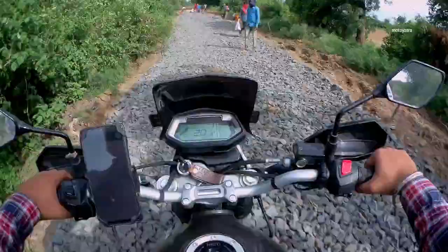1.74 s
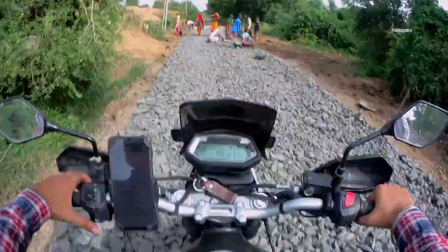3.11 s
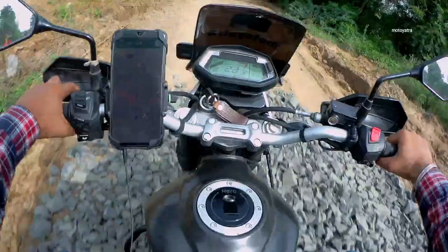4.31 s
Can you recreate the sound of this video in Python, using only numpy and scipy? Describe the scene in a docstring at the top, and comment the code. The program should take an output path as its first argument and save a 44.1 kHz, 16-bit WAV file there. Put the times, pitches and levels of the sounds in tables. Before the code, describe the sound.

A single-cylinder motorcycle creeps over coarse loose gravel, heard close and dry from the saddle. Throughout, the exhaust thuds softly, stones crunch and snap under the tyres, and a hollow plastic housing chatters, over a low rumble and a faint high hiss. In the first 1.5 seconds there are several sharp plastic knocks, with a short rasp of a sliding tyre near 0.5 seconds. Between 2 and 3 seconds the wheels drop off larger stones with dull thumps. At about 3.3 seconds the horn gives one loud, very short toot. From about 3.9 to 4.8 seconds the bike jolts over a rough patch with heavy thumps, cracking stones and a cluster of hard knocks, loudest near 4.1 seconds. Then the crunch thins on firmer ground, while the engine runs a little faster and louder and the bumping and rattling continue to the end, at about 6.7 seconds.

```python
"""On a stretch of coarse loose gravel, a single-cylinder motorcycle creeps along, heard from the saddle.
Each firing thuds softly in the exhaust, the tyres bump and crunch over the stones, and the jolts
set a hollow plastic housing chattering and knocking, all over a faint high hiss.
Halfway the horn is tapped once; then the bike jolts over a rough patch and runs on to firmer ground."""
import sys
import numpy as np
from scipy import signal
from scipy.io import wavfile
from scipy.ndimage import uniform_filter1d, minimum_filter1d

SR = 44100
rng = np.random.default_rng(int(sys.argv[2]) if len(sys.argv) > 2 else 0)


def wrap_up_sound(samples):
    """Save the sound to the file named by the first command line argument, as 16-bit audio."""
    columns = np.atleast_2d(samples).T
    # keep every value between -1 and 1, then stretch to whole-number steps
    tamed = np.clip(columns, -1, 1)
    steps = np.round(tamed * 32767).astype(np.int16)
    wavfile.write(sys.argv[1], SR, steps)


N = 293706

# The tone of the rattling housing. Each row: frequency in Hz, relative level in dB.
HOUSING_SPECTRUM = [(380, -13.5), (540, -11.5), (740, -25.5), (900, -16), (1040, -13.5), (1160, -4),
                    (1300, 0.5), (1420, -4), (1620, -9), (1720, -10), (1900, -18), (2180, -19.5),
                    (2420, -25), (15000, -64)]
# The tone of stone on stone. Each row: frequency in Hz, relative level in dB.
GRAVEL_SPECTRUM = [(900, -5.5), (2100, -1.5), (2420, -6.5), (2750, 1), (3350, -1), (3700, -3), (4050, -3),
                   (4400, -7.5), (4750, -6.5), (5600, -15), (6600, -12.5), (7220, -7.5), (7550, -13.5),
                   (15500, -36)]


def amp(db):
    """Decibels to gain."""
    return 10 ** (np.asarray(db) / 20)


def unit(x):
    """Scales to rms 1."""
    return x / np.sqrt(np.mean(x ** 2) + 1e-20)


def follow(rows):
    """Turns rows of a time and its values into one automation curve per value."""
    times, *columns = np.transpose(rows)
    return [np.interp(np.arange(N) / SR, times, column) for column in columns]


def swells(rows):
    """A bell-shaped rise and fall in dB for each row."""
    t = np.arange(N) / SR
    return sum(db * np.exp(-(2 * (t - middle) / length) ** 2) for middle, length, db in rows)


def add(mix, start_s, sound):
    """Lays a sound into the mix."""
    part = mix[max(round(start_s * SR), 0):][:len(sound)]
    part += sound[:len(part)]


def wander(rate):
    """Random drift of rms 1, up to about rate swings a second."""
    return unit(np.interp(np.arange(N) * 2 * rate / SR, np.arange(2048), rng.standard_normal(2048)))


def steady(x, seconds):
    """Evens out the slow swells of a texture, leaving its grain."""
    power = uniform_filter1d(x ** 2, int(seconds * SR))
    return x / np.sqrt(uniform_filter1d(power, int(seconds * SR / 2)) + 1e-6 * power.mean())


def colour(x, spectrum, size=4096):
    """Minimum-phase EQ, scaled to rms 1: every click keeps a sharp front and rings after."""
    hz, db = np.transpose(spectrum)
    log_hz = np.log(abs(np.fft.fftfreq(size, 1 / SR)) + 1)
    log_gain = np.log(amp(np.interp(log_hz, np.log(hz), db)))
    taps = np.fft.ifft(np.exp(np.conj(signal.hilbert(log_gain)))).real
    return unit(signal.oaconvolve(x, taps[:size // 2])[:len(x)])


def ring(modes, size=4096):
    """Response of damped modes to one click."""
    t = np.arange(size) / SR
    return sum(amp(db) * np.sqrt(width) * np.exp(-np.pi * width * t) * np.sin(2 * np.pi * hz * t)
               for hz, width, db in modes)


def impacts(per_s, spread_db):
    """Random clicks of either sign: many small, a few large."""
    at = np.flatnonzero(rng.random(N) < per_s / SR)
    rank, side = rng.random((2, N))[:, at]
    clicks = np.zeros(N)
    clicks[at] = amp(-spread_db * np.log(rank + 0.046)) * np.sign(side - 0.5)
    return unit(clicks)


def engine(effort_db, jitter=0.08, puff_cycles=0.4, rough=0.67, thud_db=-37.5, ordinary_db=-40):
    """Each firing puffs into the exhaust and rings metal and housing. Returns sound and puff envelope."""
    # The engine's run. Each row: time in seconds, firings a second, metal in dB, housing drone in dB.
    running = [(0, 20.7, -55, -44), (1.7, 20.3, -57, -41), (2.25, 22.8, -51, -37), (2.8, 24.4, -60, -39),
               (3.7, 23.4, -59, -47), (3.87, 22.4, -55, -31), (4.3, 27.9, -59, -32.5),
               (4.65, 27.2, -59, -33), (5.25, 28, -50, -31), (5.35, 28, -55, -39), (5.6, 32.7, -50, -35),
               (6.66, 31.2, -48, -36.5)]
    # What the engine sets ringing. Each row: frequency in Hz, bandwidth in Hz, relative level in dB.
    exhaust_modes = [(258.7, 35, -2), (312.4, 27, 0)]
    metal_modes = [(3020, 50, -4), (3322, 46, 1.5), (3930, 80, -15), (7140, 150, -8.5)]
    housing_modes = [(1194, 30, -6.5), (1270, 26, -4)]
    rate, metal_db, drone_db = follow(running)
    cycles = np.cumsum(rate * (1 + jitter * wander(8))) / SR
    puffs = unit(np.exp(-(cycles % 1) / puff_cycles) + 0.33)
    firings = unit(np.diff(np.floor(cycles), prepend=0) * amp(2 * wander(14)))
    gas = (1 - rough) * firings + rough * puffs * rng.standard_normal(N)
    gas = signal.sosfilt(signal.butter(3, [222, 338], "band", fs=SR, output="sos"), gas)
    upper_db = effort_db - 0.9 * np.maximum(effort_db + 44, 0)  # upper mode barely grows past -44 dB
    thud = np.zeros(N)
    for (hz, width, db), push_db in zip(exhaust_modes, (effort_db, upper_db)):
        boom = steady(signal.oaconvolve(gas, ring([(hz, width, 0)]))[:N], 0.16)
        thud += amp(db + 0.88 * (push_db - ordinary_db)) * boom
    clatter = (puffs + 1) * rng.standard_normal(N)  # valves and chain never rest between firings
    metal = steady(signal.oaconvolve(clatter, ring(metal_modes))[:N], 0.08)
    shaking = unit(clatter) + 0.55 * firings
    drone = steady(signal.oaconvolve(shaking, ring(housing_modes))[:N], 0.11)
    return amp(thud_db) * thud + amp(metal_db) * metal + amp(drone_db) * drone, puffs


def shudder(even_ground_db=-38.3, flutter_db=1.5, band_hz=(20, 34)):
    """Bike and rider shake with a very low rumble that swells at each lurch."""
    # The bike lurches. Each row: middle in seconds, length in seconds, rise in dB.
    lurches = [(1.17, 0.1, 10), (3.76, 0.11, 4), (4.4, 0.6, 5), (5.82, 0.33, 9), (6.35, 0.1, 8.5)]
    level_db = even_ground_db + swells(lurches) + flutter_db * wander(5.4)
    rumble = signal.sosfilt(signal.butter(2, band_hz, "band", fs=SR, output="sos"), rng.standard_normal(N))
    return amp(level_db) * steady(rumble, 0.16)


def tyre_bumps(effort_db, trim_db=2):
    """The tyres drop from stone to stone with dull thumps."""
    # The tone of a thump. Each row: frequency in Hz, relative level in dB.
    thump_spectrum = [(35, -16), (52, -6.5), (68, 3.5), (100, -4.5), (160, -4), (205, -8), (270, -3),
                      (380, -16), (550, -10.5), (730, -14.5), (860, -13.5), (1500, -29), (4000, -53)]
    thumps = colour(impacts(per_s=450, spread_db=4), thump_spectrum)
    return amp(effort_db + trim_db) * steady(thumps, 0.17)


def housing_chatter(level_db, puffs, engine_share=0.19, knee_db=-31, trim_db=-0.43):
    """Jolts from the road, and a little from each firing, rattle the hollow housing."""
    taps = impacts(per_s=7000, spread_db=2) * (1 - engine_share + engine_share * puffs)
    swing_db = level_db - 0.12 * np.maximum(level_db - knee_db, 0)  # hard shaking stiffens the mount
    return amp(swing_db + trim_db) * steady(colour(taps, HOUSING_SPECTRUM), 0.067)


def gravel_crunch(level_db, clump_db=1.5, clack_gain=0.28, trim_db=0.45, stone_sizes=10):
    """Stones grind together in clumps; each size of stone clicks at its own pitch."""
    t = np.arange(300) / SR
    hits = impacts(per_s=1600, spread_db=2)
    stone_size = rng.integers(0, stone_sizes, N)
    clacks = np.zeros(N)
    for k, hz in enumerate(np.geomspace(2200, 9000, stone_sizes)):
        clack = np.exp(-t * hz / 3) * np.sin(2 * np.pi * hz * t) * hz
        clacks += signal.oaconvolve(hits * (stone_size == k), clack)[:N]
    grit = impacts(per_s=12000, spread_db=0)
    grains = (clack_gain * unit(clacks) + grit) * amp(clump_db * wander(50))
    return amp(level_db + trim_db) * steady(colour(grains, GRAVEL_SPECTRUM), 0.066)


def high_hiss(crunch_db, level_db=-54, flicker_db=1):
    """A faint high hiss flickers slightly, rising and falling a little with the gravel."""
    # The tone of the hiss. Each row: frequency in Hz, relative level in dB.
    hiss_spectrum = [(100, 5), (1000, 3), (2400, -4.5), (4000, -1.5), (5800, 2), (7200, 0), (8500, -1),
                     (12500, -1.5), (14500, -4.5), (15500, -9)]
    hiss = colour(rng.standard_normal(N), hiss_spectrum)
    drift_db = 0.12 * (crunch_db - crunch_db.mean()) + flicker_db * wander(16)
    return amp(level_db + drift_db) * hiss


def pebbles(crunch_db, count=16, over_db=3, spread_db=6, low_hz=2610, high_hz=3870):
    """Small stones snap at random, most often on the loosest gravel. Returns rows for stone_snaps."""
    when, size, pitch = rng.random((count, 3)).T
    odds = np.cumsum(amp(crunch_db) ** 4)
    at = np.searchsorted(odds, when * odds[-1])
    db = crunch_db[at] + over_db + spread_db * (size - 0.5)
    return list(zip(at / SR, db, low_hz + pitch * (high_hz - low_hz)))


def stone_snaps(crunch_db, decay_s=0.0056, width_hz=450, trim_db=0.5, size=2048):
    """A stone pinched under a tyre lets go: a gritty crack with a short ring."""
    # The large stones. Each row: start in seconds, level in dB, ring pitch in Hz.
    large_stones = [(0.145, -40, 7800), (0.478, -36.5, 2510), (0.585, -41.5, 4800), (0.650, -35.5, 2930),
                    (0.712, -34.5, 2650), (0.911, -35.5, 3000), (1.788, -34, 3426), (1.866, -36, 3500),
                    (1.895, -34, 7120), (1.962, -36.5, 6800), (3.131, -36.5, 3402), (3.242, -35.5, 2650),
                    (3.350, -30.5, 3600), (4.077, -25, 2700), (4.157, -37, 4800), (4.230, -26, 2750),
                    (4.240, -32, 2100), (4.352, -32.5, 2670)]
    t, out = np.arange(size) / SR, np.zeros(N)
    for start, db, hz in large_stones + pebbles(crunch_db):
        burst = rng.standard_normal(size) * t ** 0.28 * np.exp(-t / decay_s)
        ringing = signal.fftconvolve(burst, ring([(hz, width_hz, 0)]))[:size]
        crack = colour(burst, GRAVEL_SPECTRUM) + 0.27 * unit(ringing) + 0.05 * unit(burst)
        attack_rms = np.sqrt(np.mean(crack[:size // 8] ** 2))
        add(out, start, amp(db + trim_db) * crack / attack_rms)
    return out


def housing_knocks(ring_hz=1290, light_s=0.0011, heavy_s=0.0033, grit=0.41, size=2048):
    """Hard jolts swell into the housing's main mode; heavier ones stay in contact longer."""
    # The jolts. Each row: start in seconds, level in dB.
    jolts = [(0.246, -20), (0.424, -15.5), (0.83, -16), (1.152, -18), (1.403, -18.5), (3.242, -18),
             (3.717, -25), (3.973, -19), (4.045, -15.5), (4.067, -9), (4.077, -8.5), (4.085, -11),
             (4.229, -13.5), (4.283, -13), (4.349, -16), (4.636, -15.5), (4.763, -17.5)]
    t, out = np.arange(size) / SR, np.zeros(N)
    for start, db in jolts:
        contact_s = np.interp(db, [-16, -9], [light_s, heavy_s])
        envelope = t / contact_s * np.exp(1 - t / contact_s)
        tone = np.sin(2 * np.pi * ring_hz * rng.uniform(0.983, 1.04) * t)
        rasp = colour(rng.standard_normal(size), HOUSING_SPECTRUM)
        add(out, start, amp(db) * envelope * (tone + grit * rasp))
    return out


def tyre_slides(ring_gain=0.79, width_hz=280):
    """A sliding tyre shoves gravel aside: a short rasp with the ring of the stones it moves."""
    # The slides. Each row: middle in seconds, half-length in seconds, level in dB, ring pitch in Hz.
    slides = [(0.452, 0.14, -31, 1340), (0.504, 0.22, -36, 2100), (2.81, 0.085, -47, 2280),
              (4.258, 0.08, -32, 2053), (4.44, 0.081, -35, 2050), (4.517, 0.055, -40, 2094),
              (5.803, 0.12, -41.5, 2270)]
    # The tone of the rasp. Each row: frequency in Hz, relative level in dB.
    rasp_spectrum = [(500, -14.5), (900, 4.5), (1300, 11), (1700, -6), (2050, -3.5), (2900, -4),
                     (5000, -25), (15000, -38)]
    out = np.zeros(N)
    grains = impacts(per_s=5000, spread_db=5)
    for middle, half, db, hz in slides:
        scrape = grains[int(middle * SR):][:int(2 * half * SR)]
        rasp = 0.92 * colour(scrape, rasp_spectrum)
        ringing = unit(signal.fftconvolve(scrape, ring([(hz, width_hz, 0)]))[:len(scrape)])
        push = np.exp(-np.linspace(-2.5, 2.5, len(scrape)) ** 2)
        add(out, middle - half, amp(db) * push * (rasp + ring_gain * ringing))
    return out


def wheel_drops(tyre_hz=66, frame_hz=250, trim_db=-1):
    """Tyre and frame boom together when a wheel drops off a large stone."""
    # The landings. Each row: start in seconds, level in dB.
    landings = [(1.154, -34), (2.139, -25), (2.189, -19), (2.573, -21), (2.925, -20.5), (2.985, -25),
                (3.961, -18.5), (4.004, -17), (4.519, -19), (4.728, -22), (6.32, -20)]
    boom = ring([(tyre_hz, 30, 0), (frame_hz, 50, -7)])
    out = np.zeros(N)
    for start, db in landings:
        add(out, start, amp(db + trim_db) * boom / abs(boom).max())
    return out


def horn(start_s=3.3415, length_s=0.046, hz=427.2, gain_db=2.2, clang_hz=1720, clang_peak_s=0.0095):
    """The diaphragm starts with a clang, then buzzes briefly and dies as the button is let go."""
    # The buzz, its third harmonic caught by the housing. Each row: harmonic number, level in dB.
    harmonics = [(1, -20.5), (2, -19.5), (3, 3.5), (4, -14), (5, -28), (6, -33.5), (7, -32.5), (8, -51),
                 (10, -52), (13, -58), (15, -49), (17, -40.5), (20, -62)]
    number, harmonic_db = np.transpose(harmonics)
    t, out = np.arange(int(length_s * SR)) / SR, np.zeros(N)
    buzz = np.zeros(len(t))
    for k in range(1, 21):
        phase = np.pi * k * k / 3  # staggered, so the buzz has no spikes
        buzz += amp(np.interp(k, number, harmonic_db)) * np.sin(2 * np.pi * k * hz * t + phase)
    swell = np.sin(np.pi * t / length_s) ** 3
    kick = np.exp(-(2 * (t - clang_peak_s) / clang_peak_s) ** 2)
    clang = amp(-22) * kick * np.sin(2 * np.pi * clang_hz * t)
    add(out, start_s, amp(gain_db) * (swell * buzz + clang))
    return out


def scene(effort_flutter_db=1.42, gravel_flutter_db=0.7):
    """Everything on and under the bike, close and dry; uneven stones make the levels flutter."""
    # How hard the bike labours, driving bumps and exhaust. Each row: time in seconds, level in dB.
    effort = [(0, -44), (0.65, -42.5), (1.05, -44.5), (1.75, -43.5), (2.4, -41), (3.1, -43), (3.42, -48.5),
              (3.8, -52), (4.1, -42), (4.5, -37.5), (5.0, -39), (5.6, -37), (6.3, -31.5), (6.66, -38)]
    # A wheel climbs through a rut. Each row: middle in seconds, length in seconds, rise in dB.
    ruts = [(2.17, 0.09, 5.5), (2.62, 0.24, 9), (2.98, 0.14, 12), (3.96, 0.17, 13)]
    # How loose the gravel is. Each row: time in seconds, crunch in dB, housing chatter in dB.
    looseness = [(0, -47, -34.5), (0.45, -43, -30.5), (0.68, -43.5, -31.5), (1.42, -41.5, -30.5),
                 (1.97, -41.5, -32), (2.5, -43.5, -30.5), (2.85, -45.5, -32.5), (3.3, -44.5, -33),
                 (3.43, -47.5, -36.5), (3.72, -46.5, -35), (3.89, -42, -28.5), (4.35, -40, -27),
                 (4.54, -40, -26), (4.59, -49, -31.5), (5.2, -46.5, -30), (5.35, -50, -32.5),
                 (5.6, -47.5, -32), (6.66, -49, -31)]
    # A heap of stones gives way. Each row: middle in seconds, length in seconds, rise in dB.
    heaps = [(1.44, 0.12, 3), (1.72, 0.057, 3), (2.62, 0.12, 2.5), (4.26, 0.096, 4)]
    effort_db = follow(effort)[0] + swells(ruts) + effort_flutter_db * wander(9)
    crunch_db, chatter_db = follow(looseness) + swells(heaps) + gravel_flutter_db * wander(9)
    motor, puffs = engine(effort_db)
    wheels = shudder() + tyre_bumps(effort_db) + wheel_drops()
    gravel = gravel_crunch(crunch_db) + tyre_slides() + stone_snaps(crunch_db)
    housing = housing_chatter(chatter_db, puffs) + housing_knocks()
    return (motor + wheels + gravel + housing + high_hiss(crunch_db) + horn())[None]


def record(dry, window=200, cutoff_hz=15720):
    """A limiter holds the horn at full scale and ducks the rest with it; a low-pass trims the top."""
    gain = minimum_filter1d(1 / np.maximum(abs(dry), 1), window)
    limited = dry * uniform_filter1d(gain, window)
    lowpass = signal.firwin(511, cutoff_hz, window=("kaiser", 9), fs=SR)
    return signal.oaconvolve(limited, lowpass[None], "same")


dry = scene()
out = record(dry)
wrap_up_sound(out)
```